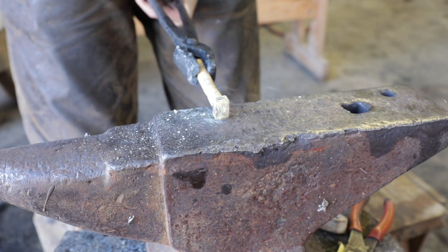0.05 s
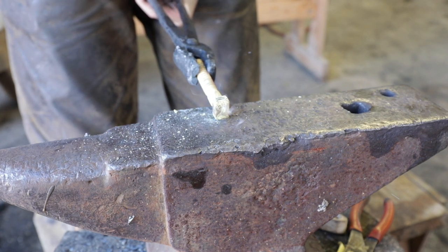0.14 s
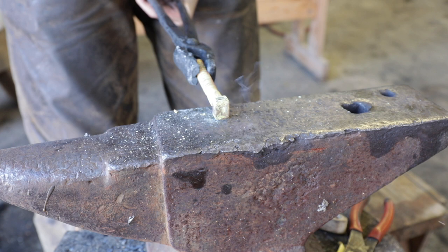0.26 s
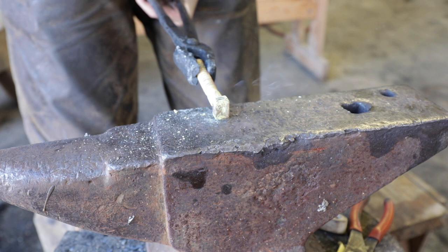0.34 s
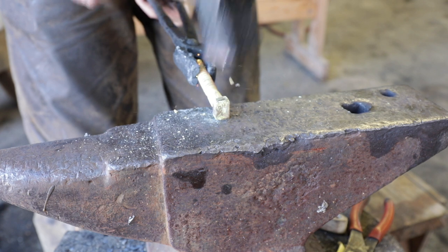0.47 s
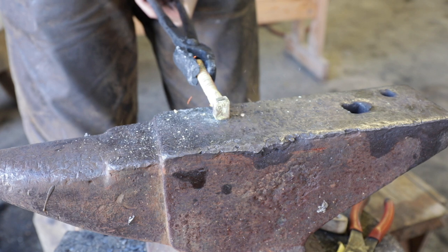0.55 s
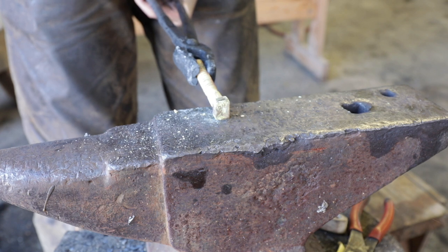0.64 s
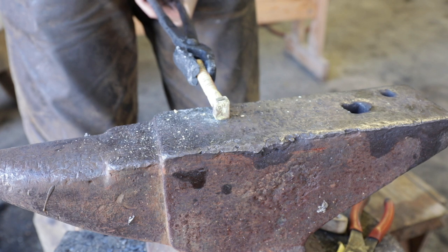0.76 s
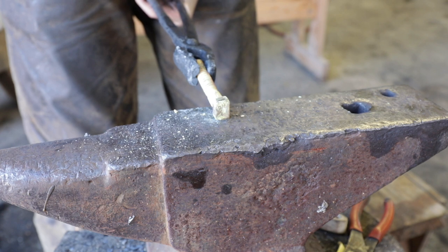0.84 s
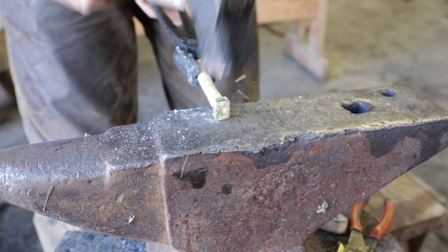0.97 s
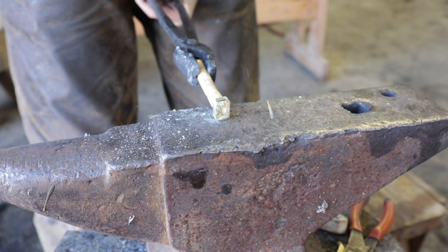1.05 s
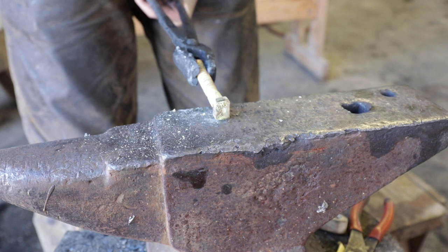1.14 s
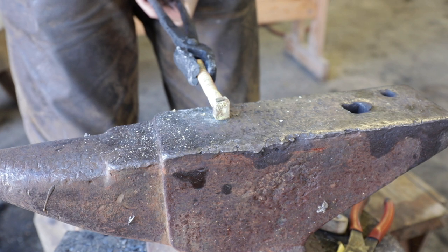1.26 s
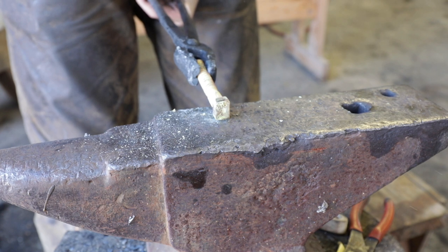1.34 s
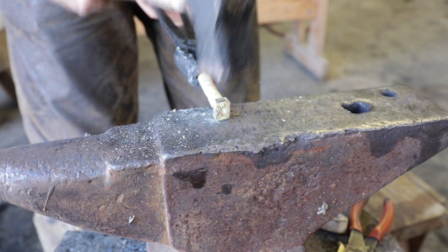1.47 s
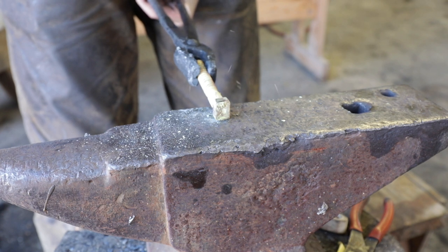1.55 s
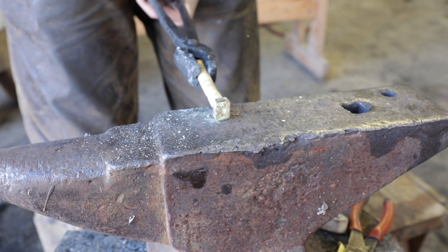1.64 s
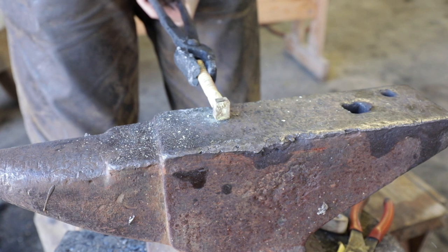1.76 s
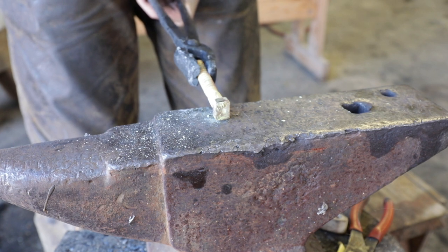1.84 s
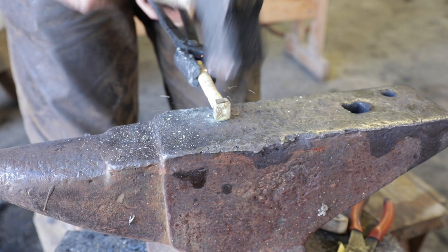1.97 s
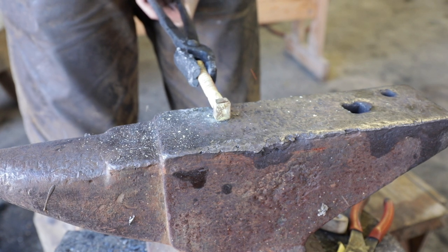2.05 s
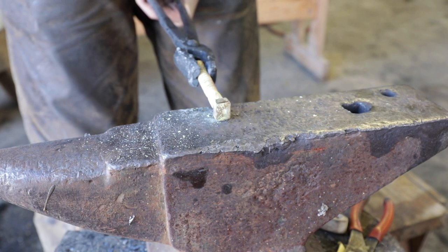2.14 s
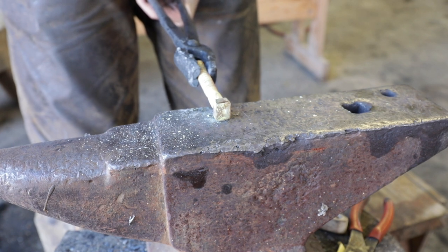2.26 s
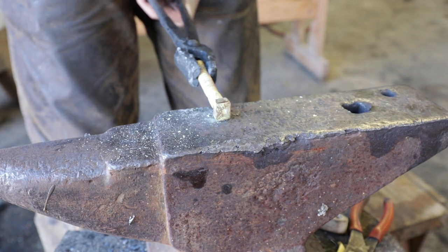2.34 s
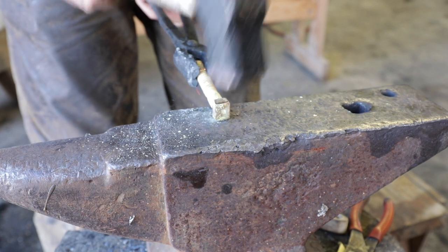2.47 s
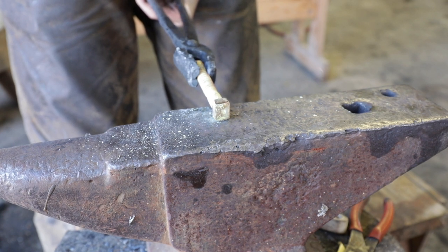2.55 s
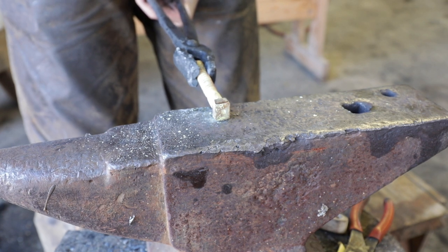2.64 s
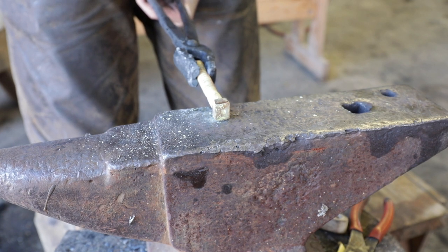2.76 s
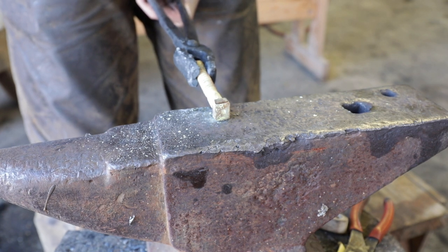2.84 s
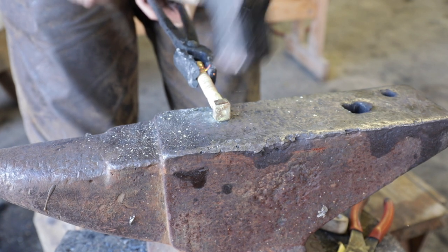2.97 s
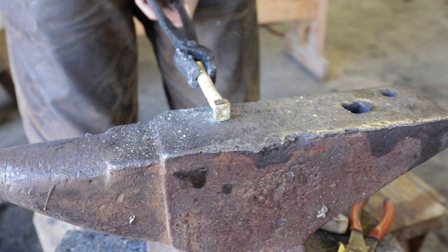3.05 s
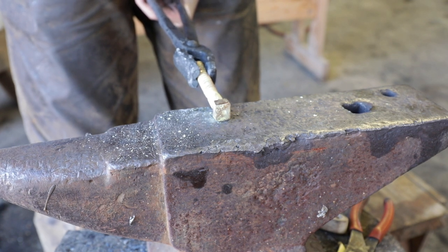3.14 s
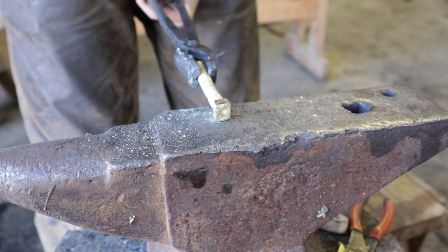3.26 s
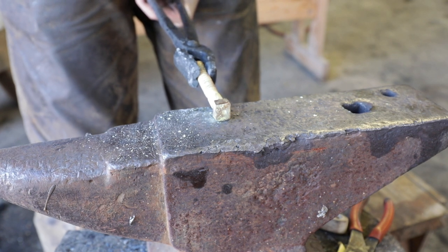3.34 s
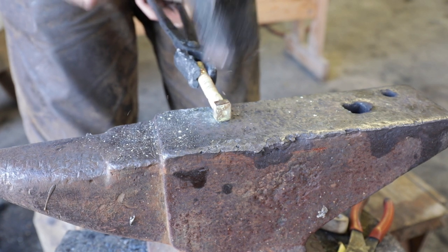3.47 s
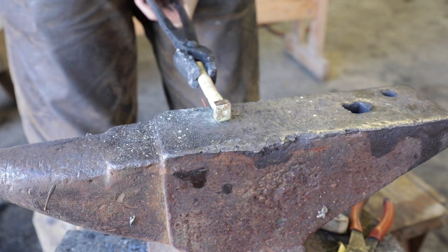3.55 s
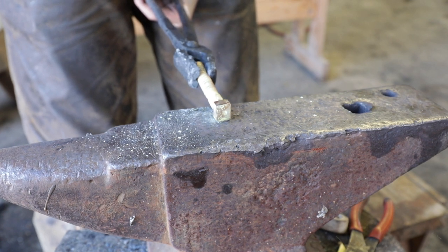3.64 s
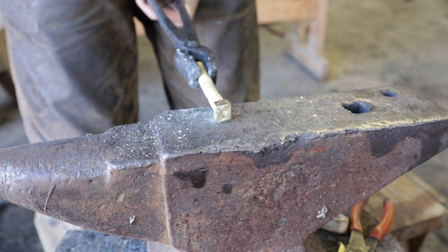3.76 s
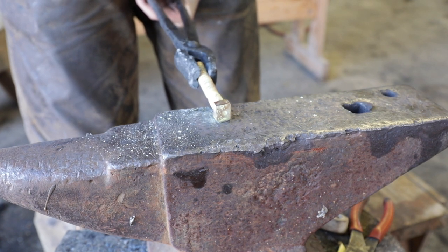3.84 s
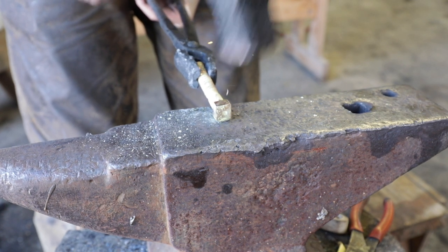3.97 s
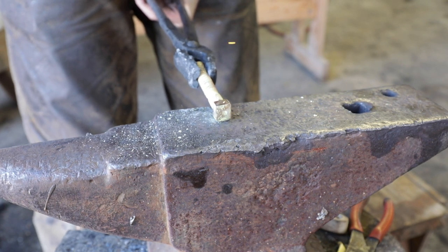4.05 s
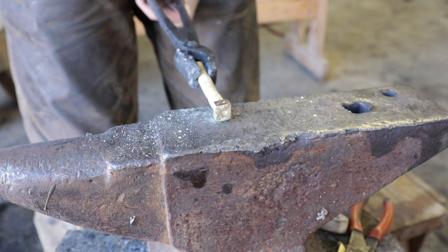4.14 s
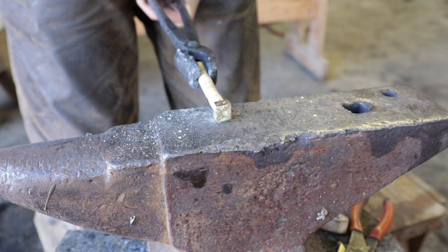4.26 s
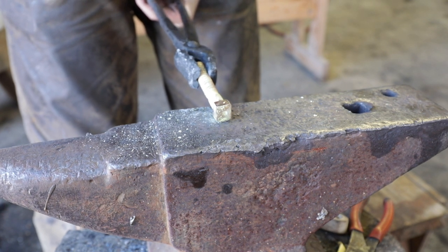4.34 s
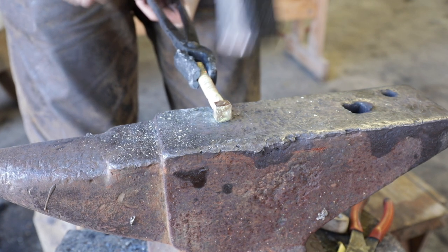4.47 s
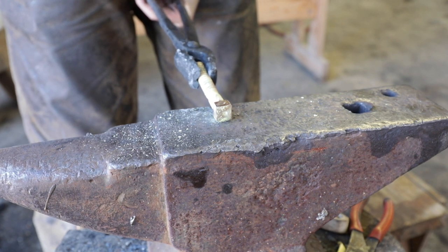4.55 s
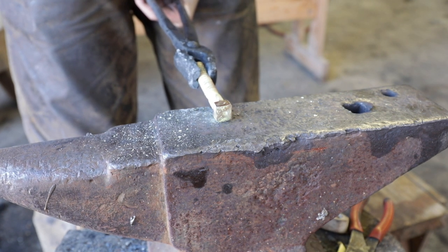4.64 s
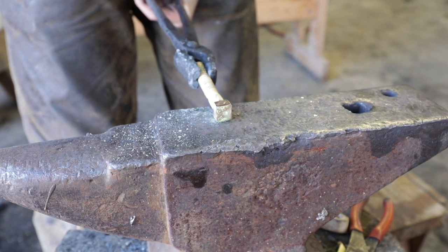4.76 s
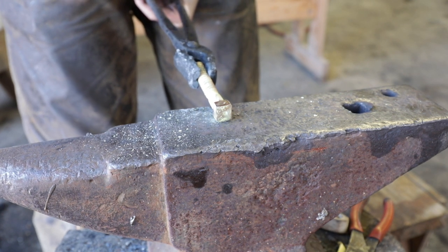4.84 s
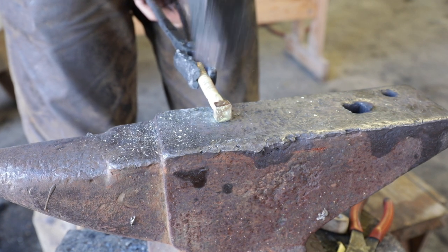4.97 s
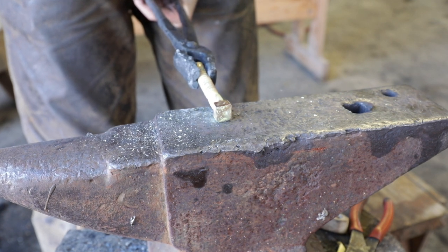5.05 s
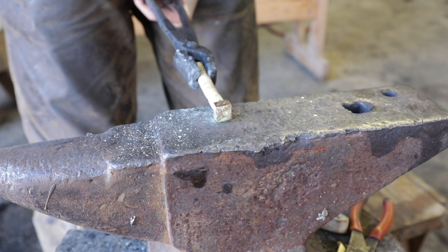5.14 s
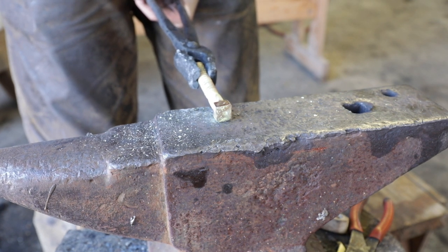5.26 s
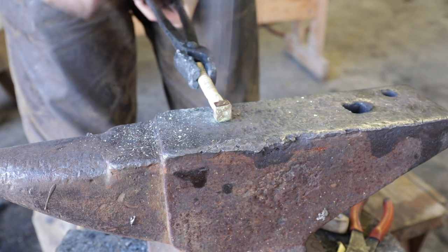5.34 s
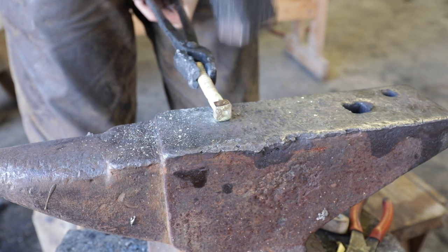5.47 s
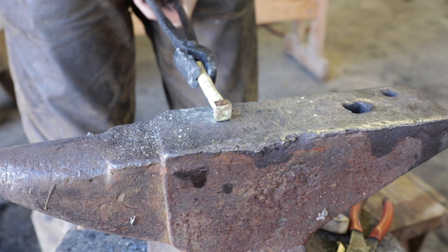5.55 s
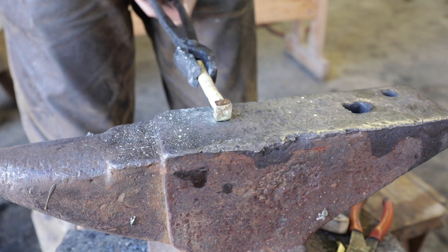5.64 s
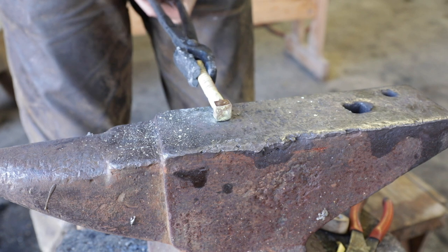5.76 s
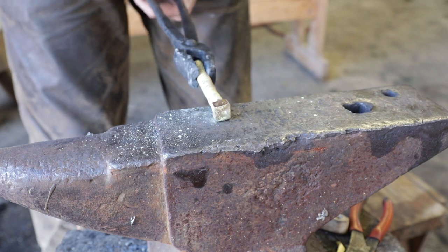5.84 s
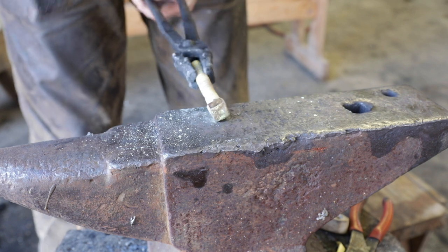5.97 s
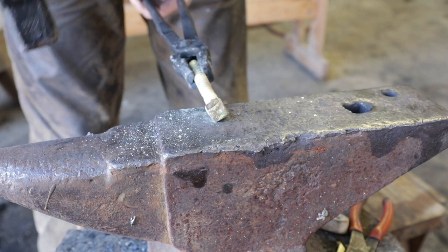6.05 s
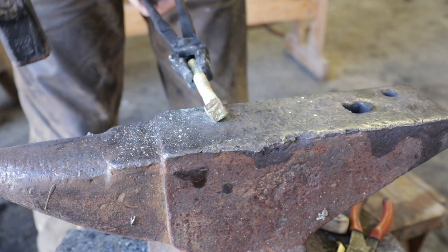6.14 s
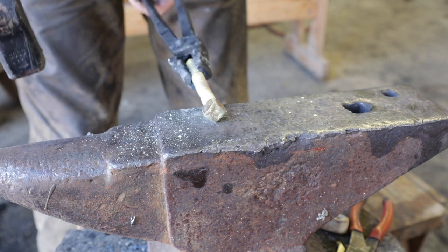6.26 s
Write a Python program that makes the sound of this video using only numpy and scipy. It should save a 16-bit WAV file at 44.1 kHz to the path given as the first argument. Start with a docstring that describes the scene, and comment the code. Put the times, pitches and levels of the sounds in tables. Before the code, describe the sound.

Close to the microphone, a smith hammers a hot bolt on an anvil in a steady rhythm. The blows are loud, dry and punchy, with short steel ringing and forge reverberation of under a second; they grow harder and brighter as the metal cools. Peaks distort a little. After the last blow the ringing dies into a soft workshop rush, with tiny gritty ticks and a faint mid-high whine.

```python
"""A smith upsets a hot bolt on a steel anvil, about two hammer blows a second, close to the microphone.
Each blow is a noise crack, a thump of the anvil's stand, struck steel modes and a high ping, with forge echoes.
The contact brightens as the bolt cools; the first blow fell just before the start, so only its tail is heard.
A dull workshop rush runs beneath; scale ticks and a faint tone end it. The input stage saturates on loud blows."""
import sys
import numpy as np
from scipy import signal
from scipy.fft import rfft, irfft, next_fast_len
from scipy.io import wavfile

SR = 44100
rng = np.random.default_rng(int(sys.argv[2]) if len(sys.argv) > 2 else 0)


def output_pcm(signal):
    """Save a mono or channel-first signal as 16-bit PCM at the path in sys.argv[1].

    Samples are clipped to [-1, 1] before scaling.
    """
    pcm = np.clip(np.atleast_2d(signal).T, -1, 1) * 32767
    wavfile.write(sys.argv[1], SR, np.round(pcm).astype(np.int16))


N = 277825


def amp(db):
    """Decibels to gain."""
    return 10 ** (np.asarray(db) / 20)


def along(points, hz):
    """A curve of (f/Hz, value) points, read on a log frequency axis."""
    f, value = np.transpose(points)
    return np.interp(np.log(hz + 1), np.log(f + 1), value)


def coloured(x, gain_db):
    """x through the causal minimum-phase filter whose gain in dB is a function of frequency."""
    m = 2 * next_fast_len(len(x))
    log_gain = np.log(amp(gain_db(np.fft.rfftfreq(m, 1 / SR))) + 1e-6)
    cepstrum = irfft(log_gain, m)
    # folding the cepstrum onto positive time makes the filter causal
    cepstrum[1:m // 2] *= 2
    cepstrum[m // 2 + 1:] = 0
    response = np.exp(rfft(cepstrum))
    return irfft(rfft(x, m) * response, m)[:len(x)]


def fade(t, t60):
    """Exponential decay, 60 dB down after t60 seconds."""
    return np.exp(-np.log(1000) * t / t60)


def ring(t, hz, db, t60):
    """One struck mode: a decaying sine."""
    return amp(db) * np.sin(2 * np.pi * hz * t) * fade(t, t60)


def reverberation(t, build_up):
    """Dense wall echoes: noise that builds up (time constant in s), then dies at a rate set by frequency."""
    # decay of the forge: f/Hz, t60/s
    forge_t60 = [(60, 0.89), (220, 0.93), (1000, 0.9), (2600, 1.008), (4100, 0.81), (5200, .63),
                 (7400, 0.59), (14000, 0.28)]
    hz, frame_s, spectrum = signal.stft(rng.standard_normal(len(t)), SR, nperseg=256)
    decay = fade(frame_s, along(forge_t60, hz)[:, None])
    tail = signal.istft(spectrum * decay, SR, nperseg=256)[1][:len(t)]
    return tail * (1 - np.exp(-t / build_up))


def in_room(x, walls, wet_db):
    """A sound together with its wall echoes."""
    return x + amp(wet_db) * signal.fftconvolve(x, walls)[:len(x)]


def impact(t, walls, crack_t60=0.064, push_db=9):
    """One sharp push of air, scattered at once by anvil, floor and smith, then by the whole forge."""
    # tone of the contact's crack: f/Hz, gain/dB
    crack_tone = [(30, 2), (100, 10), (220, 17.5), (500, 22), (1200, 14), (2000, 14), (3500, 10),
                  (7000, -17.5), (15000, -7.5)]
    # tone of the forge's echoes: f/Hz, gain/dB
    forge_tone = [(30, -3.5), (110, -2.5), (160, 4), (225, 12.5), (310, 2.5), (600, 2), (820, -2),
                  (1060, 2.5), (1400, -10.5), (2000, -7), (2650, -4.5), (3150, -17.5), (4300, -18),
                  (4900, -28), (8000, -36.5), (15000, -47.5)]
    crack = rng.standard_normal(len(t)) * fade(t, crack_t60)
    crack[0] = amp(push_db)
    direct = coloured(crack, lambda hz: along(crack_tone, hz))
    echoes = coloured(walls, lambda hz: along(forge_tone, hz))
    return direct + echoes


def stand(t):
    """Dry friction takes the same amount from every swing, so the thump stops short; a low hum lies under it."""
    # shudder of the anvil on its stand: f/Hz, level/dB, time to rest/s
    shudder = [(56.75, -8, 0.054), (199.6, -3.5, 0.052), (223.4, 4, 0.059), (468.3, -2, 0.038),
               (528.7, -9, 0.059), (667.6, -6.5, .045)]
    # low hum, its decay already under way at the blow: start after the blow/s, f/Hz, level at start/dB, t60/s
    low_hum = (-0.25, 80.5, -13, 0.57)
    thump = np.zeros(len(t))
    for hz, db, rest in shudder:
        thump += amp(db) * np.sin(2 * np.pi * hz * t) * np.maximum(1 - t / rest, 0)
    start, *mode = low_hum
    return thump + ring(np.maximum(t - start, 0), *mode)


def steel_ping(t, onset=0.021):
    """A pair of close high modes, the second much weaker, with a soft onset (time constant in s)."""
    # the pair before each blow's own ping level: f/Hz, level/dB, t60/s
    pair = [(7398, 10.5, 0.15), (7340, -13.5, 0.12)]
    return sum(ring(t, *mode) for mode in pair) * (1 - np.exp(-t / onset))


def shattering_scale(t, level_db=-17, t60=0.14):
    """Oxide scale shatters differently under each blow: a fresh burst of decaying noise."""
    return amp(level_db) * rng.standard_normal(len(t)) * fade(t, t60)


def hardness_db(s):
    """How hard the bolt meets the hammer at time s: its skin chills quickly, its core slowly."""
    hot_core_db, core_db_per_s = -4.5, 0.95
    hot_skin_db, skin_chill_s = -10.5, 0.41
    return hot_core_db + core_db_per_s * s + hot_skin_db * np.exp(-s / skin_chill_s)


def brightened(x, hard_db):
    """A shorter, harder contact puts more into the treble."""
    # share of the hardness that each frequency takes: f/Hz, share
    hardness_share = [(500, 0.092), (1500, 0.2), (2600, 0.77), (4100, 0.85), (5400, 0.1), (10000, 0.38)]
    return coloured(x, lambda hz: hard_db * along(hardness_share, hz))


def hammer(ring_wet_db=-54, ping_wet_db=-56, vary_db_per_khz=0.28, bite=0.26):
    """The same struck anvil in the same room for every blow; force varies and the contact hardens."""
    # hammer blows: t/s, force level/dB, high ping level/dB
    blows = [(-0.12, -2.5, -10), (0.518, -5, -7), (1.0268, -5, 0), (1.5286, -4.5, -7), (2.016, -4.5, -5.5),
             (2.5136, -4, -5.5), (3.0111, -5, -3), (3.5075, -4.5, -3.5), (4.0015, -4.5, -16),
             (4.4944, -4.5, -6), (4.9862, -5.5, -5.5), (5.475, -4.5, -3.5)]
    # anvil and hammer ring together, before variation and force: f/Hz, level/dB, t60/s
    steel_modes = [(1247, 23, 0.0037), (1251, 4, 0.045), (1530, 1.5, 0.014), (2267, -2, 0.18),
                   (2530, -16.5, 0.52), (2571, 7.5, 0.11), (2746, 5.5, 0.11), (3576, -5.5, 0.11),
                   (5150, -14, 0.081), (5676, -13, 0.018), (9690, -44.5, 0.47), (10400, -31, 0.22)]
    # the face first presses the bolt home: lead ahead of the blow/s, f/Hz, level/dB, t60/s
    first_touch = (.0014, 1097.5, -29, 1.04)
    t = np.arange(SR + SR // 2) / SR
    walls = reverberation(t, build_up=0.0026)
    knock = impact(t, walls) + stand(t)
    steel = np.array([in_room(ring(t, *mode), walls, ring_wet_db) for mode in steel_modes])
    steel_khz = np.array(steel_modes)[:, 0] / 1000
    ping = steel_ping(t)
    lead, *touch_mode = first_touch
    # a second of room ahead of the start holds the beginning of the first blow
    out = np.zeros(N + 3 * SR)
    for s, force_db, ping_db in blows:
        hard_db = hardness_db(s)
        # the point of contact wanders a little, which the high modes feel most
        mode_gain = amp(vary_db_per_khz * steel_khz * rng.standard_normal(len(steel)))
        clang = mode_gain @ steel
        # a bolt that is still soft cushions the steel
        clang = clang * amp(bite * min(hard_db, 0))
        blow = brightened(knock + clang + shattering_scale(t), hard_db)
        # short waves feel every move of the smith, so the ping's echoes are new each time
        ping_walls = reverberation(t, build_up=0.0063)
        blow = blow + amp(ping_db) * in_room(ping, ping_walls, ping_wet_db)
        out[SR + round(s * SR):][:len(t)] += amp(force_db) * blow
        out[SR + round((s - lead) * SR):][:len(t)] += ring(t, *touch_mode)
    return out[SR:][:N]


def background(whine_hz=1300, width_hz=45):
    """The workshop's dull rush is filtered noise; a narrow noise band makes a thin tone that swells at the end."""
    # tone of the steady rush: f/Hz, gain/dB
    rush_tone = [(25, -51), (70, -33), (120, -42), (250, -44), (1200, -48.5), (3000, -60.5), (6000, -78.5),
                 (15000, -89.5)]
    # swell of the thin tone: t/s, RMS level/dB
    whine_swell = [(6.08, -78), (6.169, -57), (6.3, -61)]
    rush = coloured(rng.standard_normal(N), lambda hz: along(rush_tone, hz))
    whine = coloured(rng.standard_normal(N),
                     lambda hz: -20 * np.log10(1 + ((hz - whine_hz) / width_hz) ** 2))
    whine_db = np.interp(np.arange(N) / SR, *np.transpose(whine_swell))
    return rush + whine / whine.std() * amp(whine_db)


def ticks(tick_hz=7700, t60=0.012):
    """Loose scale ticks on the anvil's face as the bolt is lifted: tiny gritty noise bursts."""
    # ticks: t/s, level/dB
    tick_times = [(6.029, -56), (6.114, -55), (6.268, -60)]
    t = np.arange(SR // 10) / SR
    out = np.zeros(N + SR)
    for s, db in tick_times:
        burst = rng.standard_normal(len(t)) * fade(t, t60)
        # 14 dB per octave away from the centre
        grit = coloured(burst, lambda hz: -14 * abs(np.log2((hz + 1) / tick_hz)))
        out[round(s * SR):][:len(t)] += amp(db) * grit
    return out[:N]


def scene():
    """Everything that reaches the one microphone."""
    return (hammer() + background() + ticks())[None]


def record(dry, top=0.95, knee=4.5, low_hz=8, top_hz=15750):
    """The input stage saturates on loud peaks; its flat tops droop, and the band ends steeply."""
    clipped = dry / (1 + abs(dry / top) ** knee) ** (1 / knee)
    drooped = signal.lfilter(*signal.butter(1, low_hz, "high", fs=SR), clipped)
    m = next_fast_len(N + SR)
    edge = 1 / (1 + (np.fft.rfftfreq(m, 1 / SR) / top_hz) ** 300)
    return irfft(rfft(drooped, m) * edge, m)[:, :N]


dry = scene()
out = record(dry)
output_pcm(out)
```